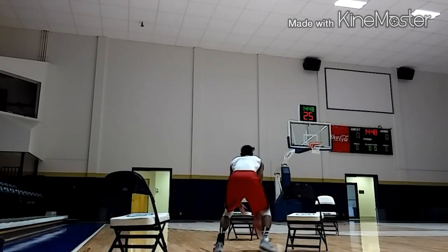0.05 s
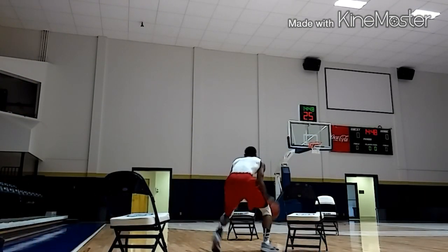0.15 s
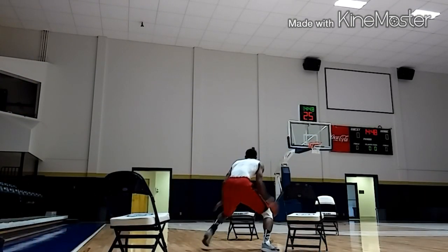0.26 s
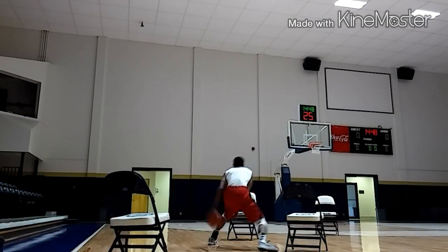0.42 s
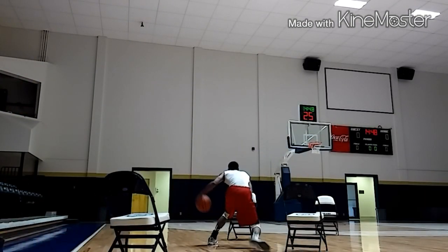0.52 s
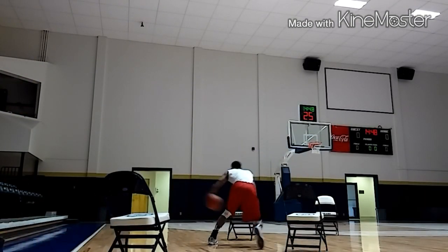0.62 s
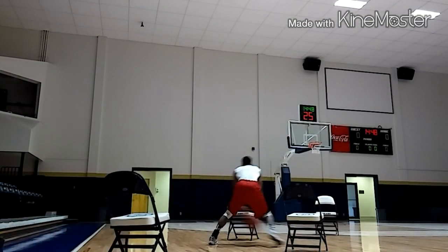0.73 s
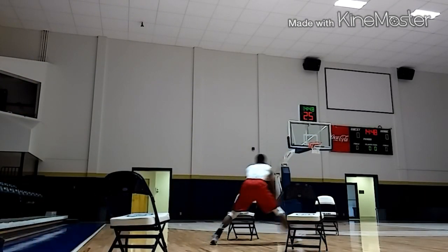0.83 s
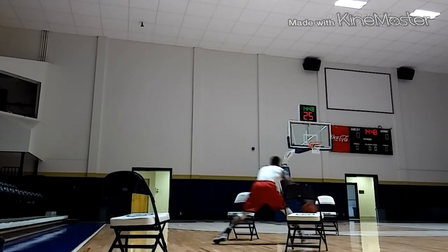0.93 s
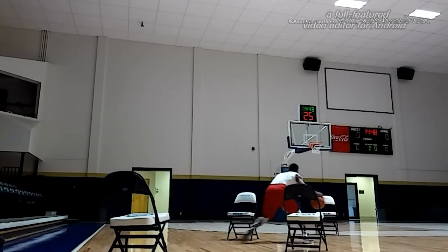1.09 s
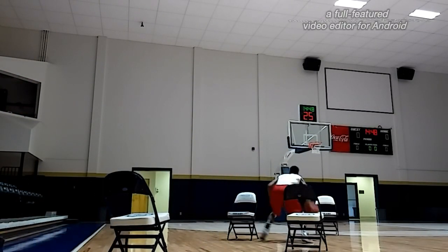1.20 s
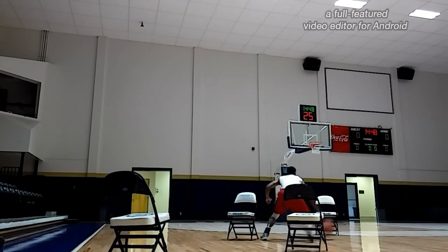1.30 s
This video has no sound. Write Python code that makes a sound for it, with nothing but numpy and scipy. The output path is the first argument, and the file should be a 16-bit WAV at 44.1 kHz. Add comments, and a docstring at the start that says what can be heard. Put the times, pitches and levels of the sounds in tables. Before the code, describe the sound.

A basketball is dribbled on a wooden floor a few metres away in a large, echoing gym. Over faint room noise and a lingering echo, a rubbery slap and thud lands at about 0.2 seconds. A sneaker squeaks briefly at 0.3 seconds, high and falling. Two quick hits of ball and shoe come around 0.5 seconds and another near 1 second, with softer thuds at 0.8 and 1.1 seconds.

```python
"""A large hall, with its steady background, still rings from a bounce as a player dribbles a basketball
on a sprung wooden floor a few metres from a phone. Each blow of ball or shoe begins with a rubber slap
and a knock of the boards; a thud swells, and the boards and the air inside the ball ring on.
Ceiling and walls return distinct echoes, then a long tail. At 0.3 s one sole squeals with falling pitch
as it sticks and slips, and further blows follow."""
import sys
import numpy as np
from scipy import signal
from scipy.fft import rfft, irfft
from scipy.io import wavfile
from scipy.ndimage import uniform_filter1d

SR = 44100
rng = np.random.default_rng(int(sys.argv[2]) if len(sys.argv) > 2 else 0)


def transcribe(signal):
    """Save signal, clipped to [-1, 1], as a 16-bit WAV file at the path in sys.argv[1]."""
    frames = np.atleast_2d(signal).T
    limited = np.clip(frames, -1, 1)
    pcm = np.round(limited * 32767).astype(np.int16)
    wavfile.write(sys.argv[1], SR, pcm)


N = 59535
LEAD_S = .4  # the hall is excited this long before listening begins


def undb(db):
    """Amplitude ratio of a level in decibels."""
    return 10 ** (np.asarray(db) / 20)


def fade(t, t60):
    """Exponential decay: 60 dB in t60 seconds."""
    return np.exp(-np.log(1000) * t / t60)


def lowpass(x, hz):
    """Second-order attenuation above hz."""
    return signal.lfilter(*signal.butter(2, min(hz, SR / 2.5), fs=SR), x)


def mode(t, hz, db, t60):
    """Free vibration of a damped resonator."""
    return undb(db) * np.sin(2 * np.pi * hz * t) * fade(t, t60)


def spectral_gain(n, curve):
    """Gain at each frequency of an n-sample spectrum, from levels interpolated over log frequency."""
    hz, db = np.array(curve).T
    log_hz = np.log(np.arange(n // 2 + 1) * SR / n + 1)
    return undb(np.interp(log_hz, np.log(hz), db))


def background(level_db=-54):
    """Stationary coloured noise: the steady background of the hall."""
    # background spectrum: frequency_hz, relative_density_db
    spectrum = [(18, -87), (30, -57), (252, 10.5), (473, -8), (650, 3), (900, 0), (1700, -14), (2800, -37),
                (3700, -12), (5310, -8.5), (6050, -14), (16000, -25)]
    noise = irfft(rfft(rng.standard_normal(N)) * spectral_gain(N, spectrum), N)
    return noise * undb(level_db) / noise.std()


def board_thud(t, noise, thud_hz, thud_db, floor_db):
    """Low resonances of a sprung floor: a short thud, a broad rumble and a longer ring swell together."""
    rumble = undb(thud_db + 15) * lowpass(noise, 360) * fade(t, t60=.068)
    rumble = signal.lfilter(*signal.butter(2, 109, "high", fs=SR), rumble)
    thud = 2 * mode(t, thud_hz, thud_db, t60=.022)
    floor_ring = mode(t, hz=190, db=floor_db, t60=.097)
    return (thud + rumble + floor_ring) * (1 - np.exp(-t / .0022))


def blows(n):
    """Impact excitation: each blow slaps, sets boards and ball ringing, and reflects off the hall."""
    # ball and shoe blows: start_s, rebound_delay_s, rebound_db, slap_db, slap_top_hz, knock_hz,
    # knock_db, low_knock_hz, low_knock_db, thud_hz, thud_db, ball_db, floor_db, ceiling_db,
    # ceiling_delay_s, wall_delay_s
    impacts = [(-.25, 0.00073, -5.5, 0.5, 2000, 1390, -45, 786, -1.5, 202, -18, -32, -26, -15, .037, 0.094),
               (.005, 0.0052, -30, -36, 5400, 1620, -24.5, 940, -24, 240, -25, -63, -42, -17, 0.049, 0.13),
               (.2281, 0.001014, -7, -5.5, 9000, 1810, -8.5, 1160, -7, 122, -15.5, -33.5, -29, -29, 0.033, 0.077),
               (0.4889, 0.0012, 6, -21.5, 8600, 1880, -10, 800, -16, 190, -16.5, -35.5, -22, -3, 0.037, .069),
               (0.5429, .0038, -9, -7.5, 6500, 2970, -12.5, 1177, -9.5, 262, -16.5, -31, -55, -12.5, 0.043, 0.08),
               (0.784, 0.0069, -11, -48, 2000, 1520, -47, 674.7, -43, 193, -30, -50, -27, -16, 0.051, 0.064),
               (0.963, .0016, -21, -10.5, 7440, 1790, -15, 1110, -21, 199.2, -28, -37.5, -27.5, -11, 0.033, .066),
               (1.089, 0.0097, -10, -62, 2000, 1592, -79, 860, -80, 74, -30.5, -93, -61, -10, 0.029, .070)]
    # air modes of the ball and ring of the boards: pitch_hz, level_db, t60_s
    ring_modes = [(465, 0, .1), (745, 2, .07), (1017, 6, .07), (1170, -2, .06), (1645, 2, .08),
                  (1865, -4, .06), (2195, 0, .07), (2740, -8, .04), (3720, -12, .025), (4160, -14, .025)]
    ring_hz, ring_db, ring_t60 = np.array(ring_modes).T[:, :, None]
    out, t = np.zeros(n), np.arange(SR // 4) / SR
    rattle_band = signal.butter(1, [400, 2840], "band", fs=SR)
    for (start_s, rebound_s, rebound_db, slap_db, slap_top_hz, knock_hz, knock_db, low_hz, low_db,
         thud_hz, thud_db, ball_db, floor_db, ceiling_db, ceiling_s, wall_s) in impacts:
        noise = rng.standard_normal(len(t))
        scatter_db = 1.5 * rng.standard_normal(ring_db.shape)
        slap = undb(slap_db) * lowpass(noise, slap_top_hz) * fade(t, t60=.006)
        knock = mode(t, knock_hz, knock_db, t60=.0057) + mode(t, low_hz, low_db, t60=.011)
        hit = (slap + knock) * (1 - np.exp(-t / .00013))
        # shifting or reversing the noise decorrelates rattle and rumble from the slap
        rattle = signal.lfilter(*rattle_band, np.roll(noise, len(t) // 2))
        rattle *= undb(knock_db - 6.5) * fade(t, t60=.072)
        thud = board_thud(t, noise[::-1], thud_hz, thud_db, floor_db)
        ring = mode(t, ring_hz, ball_db + ring_db + scatter_db, ring_t60).sum(axis=0)
        onset = int((start_s + LEAD_S) * SR)
        arrivals = [(onset, hit + thud + rattle + ring),
                    (int((start_s + rebound_s + LEAD_S) * SR), undb(rebound_db) * hit),
                    (onset + int(ceiling_s * SR), undb(ceiling_db) * lowpass(hit, 4000)),
                    (onset + int(wall_s * SR), undb(-22) * lowpass(hit, 9000))]
        for i, sound in arrivals:
            out[i:i + len(t)] += sound[:n - i]
    return out


def reflection(t, delay_s, db, highpass_hz, lowpass_hz, smear_s):
    """Scattered reflection: a delayed, filtered noise burst that dies away within smear_s."""
    burst = rng.standard_normal(len(t)) * (t >= delay_s) * fade(np.abs(t - delay_s), smear_s)
    burst = lowpass(burst / np.sqrt(np.sum(burst ** 2)), lowpass_hz)
    return undb(db) * signal.lfilter(*signal.butter(1, highpass_hz, "high", fs=SR), burst)


def hall(n, echoes, smear_s, flutter_db, tail_colour):
    """Impulse response: direct sound, early reflections, flutter echo and double-slope reverberation."""
    # reverberant tail: centre_hz, early_db, early_t60_s, late_db, late_t60_s
    bands = [(64, -34, 0.48, -46.5, 5.2), (149, -48.5, 1, -49, 1.1), (281, -16.5, 0.23, -42.5, 3.64),
             (469, -27, 0.28, -55, 5), (1070, -43.5, 0.34, -44, 1.92), (2000, -35.5, 0.26, -45.5, 1.57),
             (3580, -61, 0.14, -46, 1.94), (5400, -30, 0.15, -49, 2.13), (8500, -41, 0.77, -44, 0.79),
             (13000, -43, 0.18, -55, 0.68), (16450, -37, 0.63, -59, 0.92)]
    flutter_period_s, flutter_t60_s, tail_rise_s = .108, 3., .045
    t = np.arange(n) / SR
    response = signal.unit_impulse(n)
    for echo in echoes:
        response += reflection(t, *echo, smear_s)
    for k in range(1, 12):  # each round trip is weaker and more smeared
        delay_s = k * flutter_period_s
        db = flutter_db - 60 * delay_s / flutter_t60_s
        response += reflection(t, delay_s, db, highpass_hz=6000, lowpass_hz=3800, smear_s=k * .0005)
    spectrum = spectral_gain(n, tail_colour) * rfft(rng.standard_normal(n))
    log_hz = np.log(np.arange(n // 2 + 1) * SR / n + 1)
    log_centres = np.log(np.array(bands)[:, 0])
    build_up = 1 - np.exp(-(t / tail_rise_s) ** 2)
    for k, (_, early_db, early_t60, late_db, late_t60) in enumerate(bands):
        band_weight = np.interp(log_hz, log_centres, np.arange(len(bands)) == k)
        decay = undb(early_db) * fade(t, early_t60) + undb(late_db) * fade(t, late_t60)
        response += irfft(spectrum * band_weight, n) * decay * build_up
    return response


def squeal(n):
    """Stick-slip oscillation of a sole: three trembling harmonics, and a rasp as it loses its grip."""
    # course of the squeal: time_s, pitch_hz, fundamental_db, second_db, third_db, roughness_ratio
    glide = [(.3068, 8000, -45, -70, -90, .01), (.3079, 7100, -12, -30, -90, .01),
             (.3105, 6190, -10, -25, -90, .01), (.3125, 5830, -8, -18, -72, .01),
             (.3155, 5690, -6, -15, -64, .01), (.319, 5560, -10, -38, -62, .01),
             (.3215, 5500, -7, -24, -56, .015), (.3245, 5250, -6, -23, -50, .02),
             (.326, 5190, -14, -21, -41, .02), (.3287, 5200, -3, -25, -36, .01),
             (.3308, 4750, -15, -25, -32, .04), (.333, 4600, -11, -32, -28, .05),
             (.3355, 3900, -33, -19, -28, .05), (.3385, 3780, -16, -24, -27, .04),
             (.3408, 3710, -8, -21, -26, .035), (.3445, 3620, -12, -13, -31, .035),
             (.347, 3730, -20, -19, -35, .03), (.3495, 3790, -22, -30, -44, .03),
             (.353, 3690, -40, -50, -60, .01)]
    top_hz, rasp_s, rasp_width_s = 15350, .334, .004
    t = np.arange(n) / SR - LEAD_S
    times, *tracks = np.array(glide).T
    hz, *levels_db, roughness = (np.interp(t, times, track) for track in tracks)
    tremble = 3 * uniform_filter1d(rng.standard_normal(n), size=10)
    phase = 2 * np.pi * np.cumsum(hz * (1 + roughness * tremble)) / SR
    tone = sum(undb(db) * np.sin(k * phase) * (k * hz < top_hz) for k, db in enumerate(levels_db, 1))
    hiss = lowpass(np.diff(rng.standard_normal(n + 1)), 11000)
    rasp = undb(-24) * np.exp(-.5 * ((t - rasp_s) / rasp_width_s) ** 2) * hiss
    wobble_db = 5.6 * uniform_filter1d(uniform_filter1d(rng.standard_normal(n), size=40), size=40)
    sliding = (t > times[0]) & (t < times[-1])
    return tone * undb(wobble_db) * sliding + rasp


def scene():
    """Superposition: blows and squeal, each convolved with its own hall response, over the background."""
    # early reflections of the blows: delay_s, level_db, highpass_hz, lowpass_hz
    blow_echoes = [(.004, -13.5, 201, 5000), (.0074, -19, 197, 6040), (0.0107, -15.5, 192, 5000),
                   (0.0132, -11, 204, 4000), (0.016, -14.5, 196, 4000), (.048, -49, 99.9, 2970),
                   (0.075, -29, 300, 3000), (0.103, -15.5, 303, 2930), (.122, -12, 200, 6000)]
    # early reflections of the squeal: delay_s, level_db, highpass_hz, lowpass_hz
    squeal_echoes = [(.0074, -22, 2000, 9000), (.0119, -20, 2000, 9000), (.0356, -17, 9000, 11000),
                     (.0405, -14, 6000, 7000), (.0745, -13, 13000, 15000), (.102, -22, 4000, 8000)]
    # colour of the squeal as it reaches the far hall: frequency_hz, gain_db
    far_colour = [(3000, -1), (3700, -6), (4200, -1), (4900, -6), (5250, -5), (5600, -2), (6200, -6),
                  (7300, -5), (9000, -2), (11000, -5)]
    flat_colour = [(1, 0)]
    n = N + int(LEAD_S * SR)
    dribble = signal.fftconvolve(
        blows(n), hall(n, blow_echoes, smear_s=.0015, flutter_db=-28, tail_colour=flat_colour))
    sole = signal.fftconvolve(
        squeal(n), hall(n, squeal_echoes, smear_s=.00001, flutter_db=-18, tail_colour=far_colour))
    return ((dribble + sole)[n - N:n] + background())[None]


def record(dry):
    """Band limiting: the phone loses the deep bass and cuts the top steeply."""
    bass_cut = signal.butter(4, 75.6, "high", fs=SR, output="sos")
    treble_cut = signal.ellip(10, .2, 80, 15350, fs=SR, output="sos")
    return signal.sosfilt(treble_cut, signal.sosfilt(bass_cut, dry))


dry = scene()
out = record(dry)
transcribe(out)
```